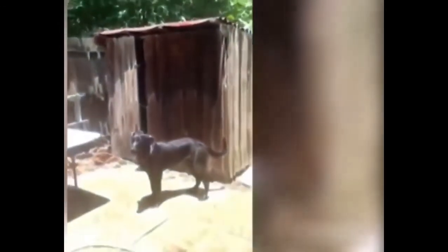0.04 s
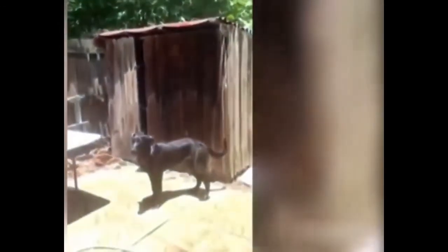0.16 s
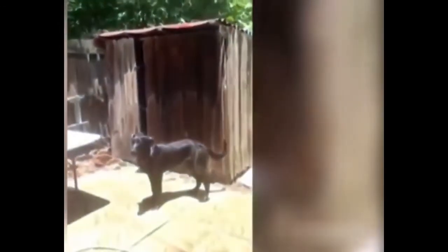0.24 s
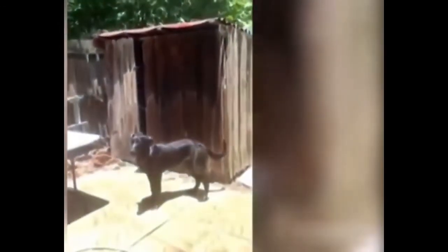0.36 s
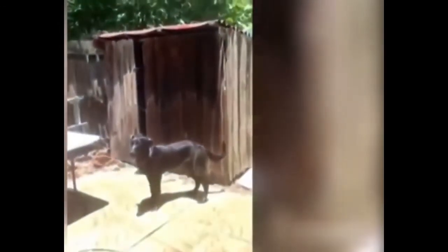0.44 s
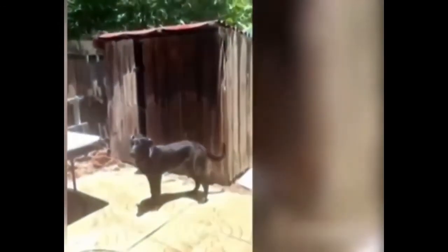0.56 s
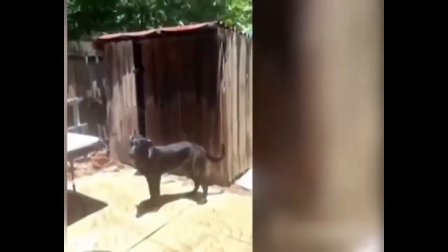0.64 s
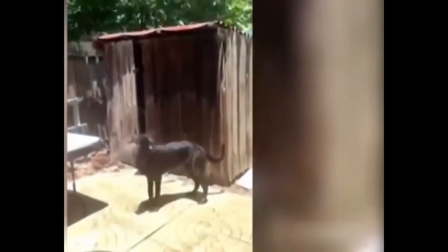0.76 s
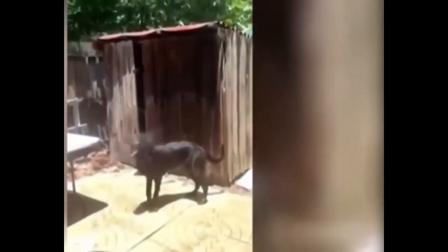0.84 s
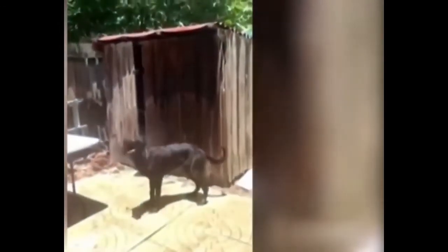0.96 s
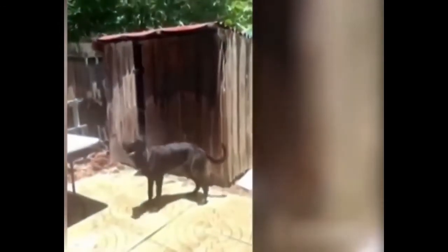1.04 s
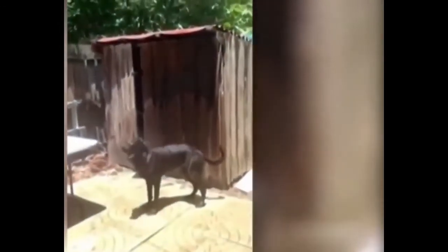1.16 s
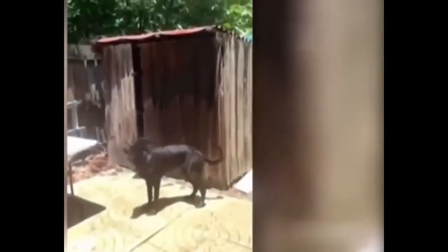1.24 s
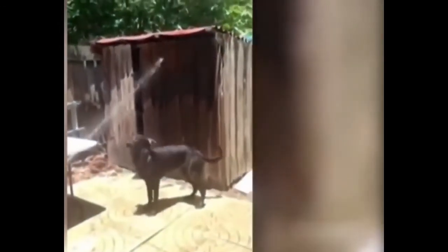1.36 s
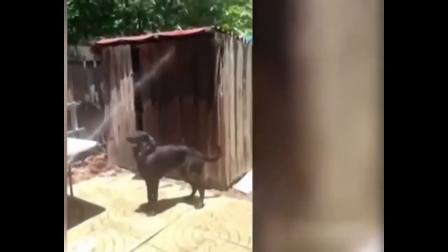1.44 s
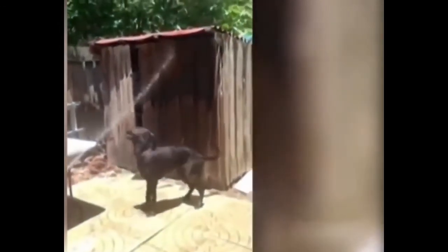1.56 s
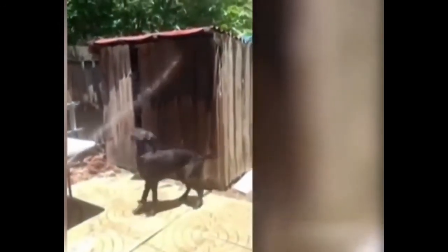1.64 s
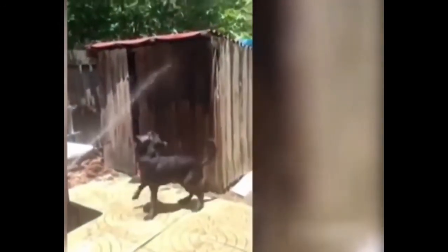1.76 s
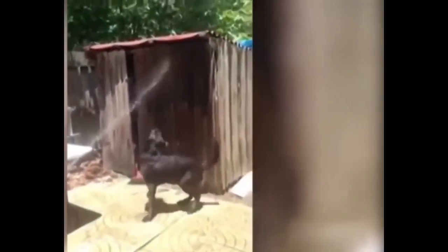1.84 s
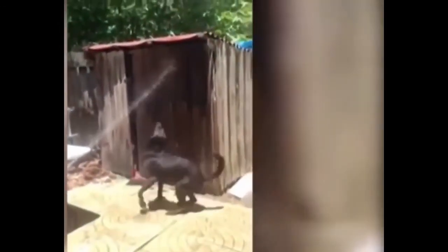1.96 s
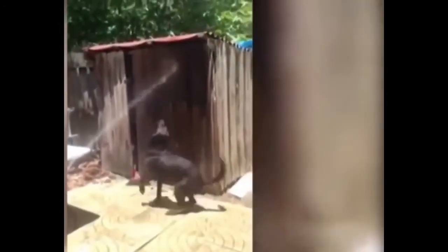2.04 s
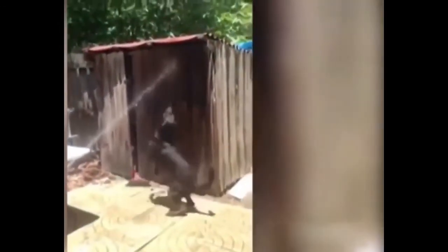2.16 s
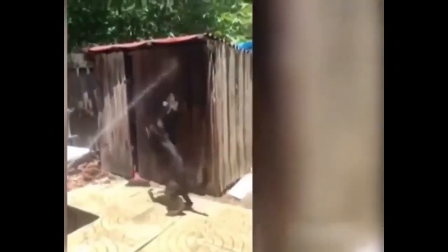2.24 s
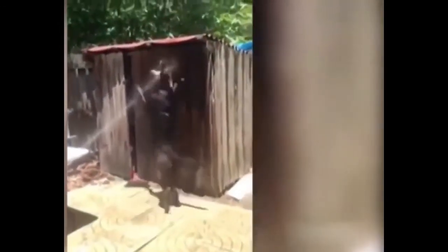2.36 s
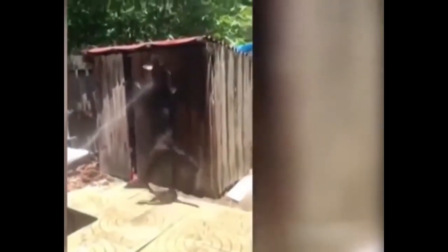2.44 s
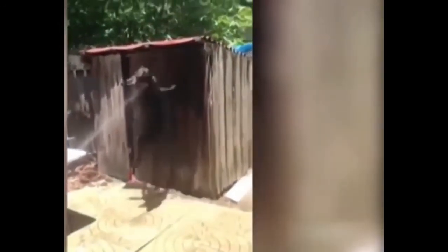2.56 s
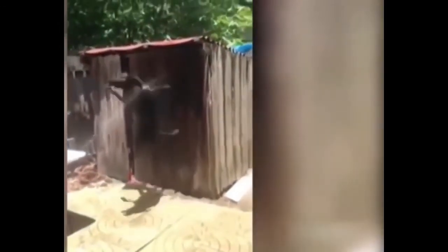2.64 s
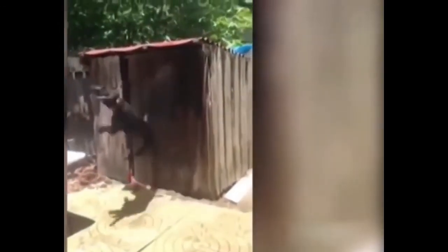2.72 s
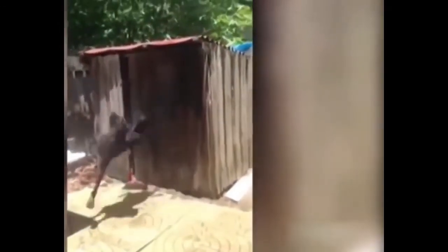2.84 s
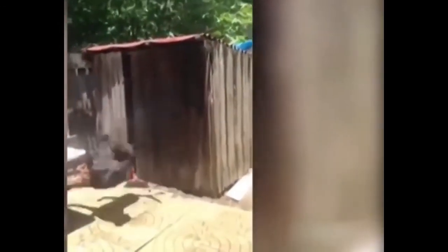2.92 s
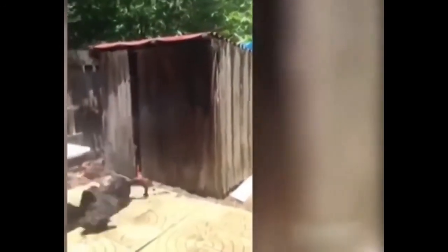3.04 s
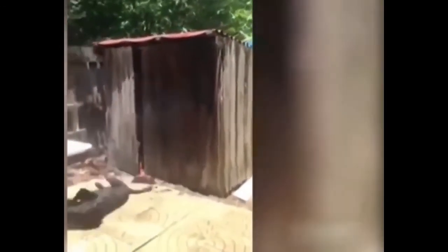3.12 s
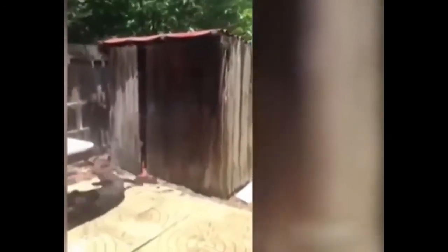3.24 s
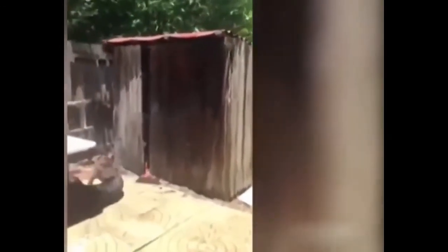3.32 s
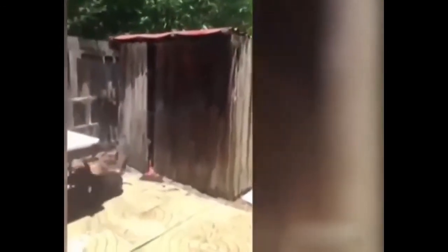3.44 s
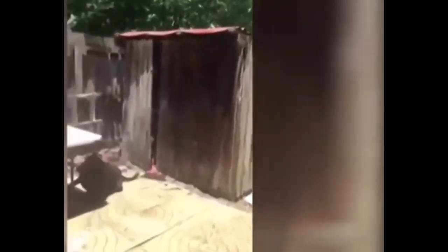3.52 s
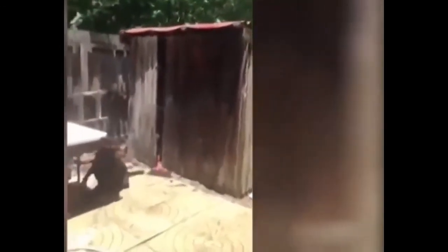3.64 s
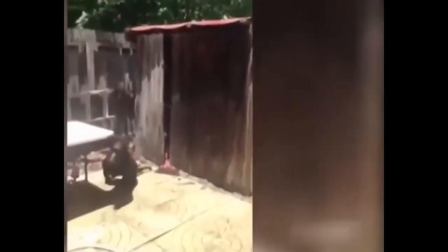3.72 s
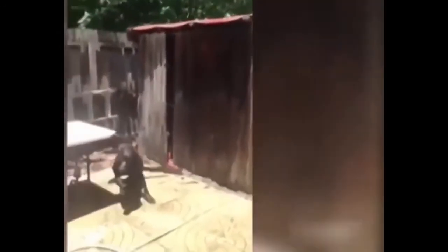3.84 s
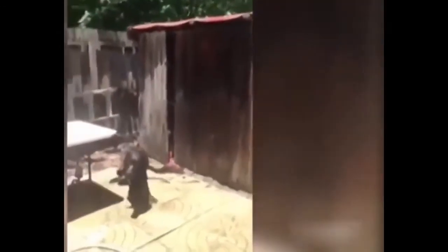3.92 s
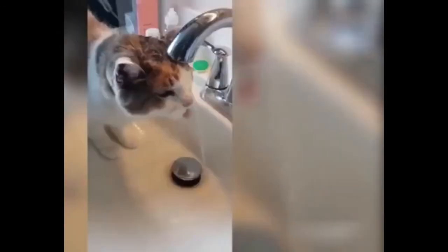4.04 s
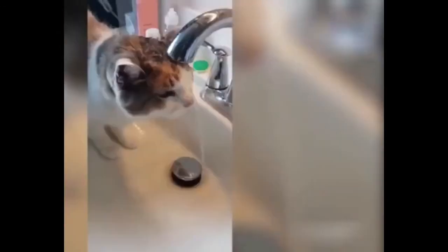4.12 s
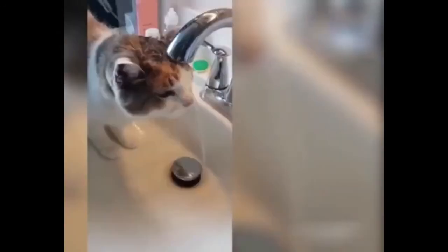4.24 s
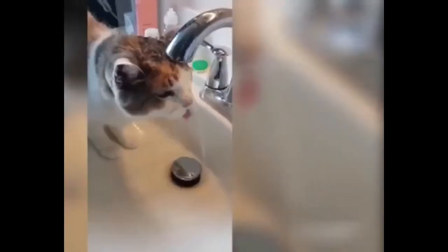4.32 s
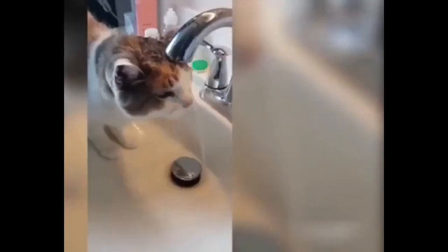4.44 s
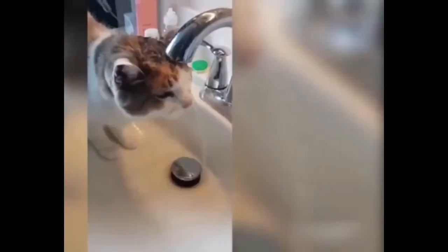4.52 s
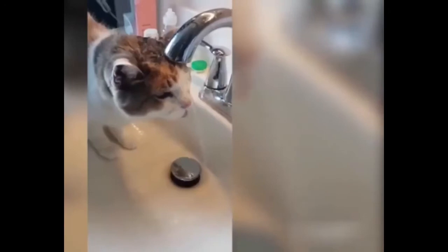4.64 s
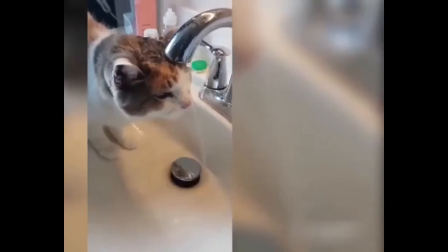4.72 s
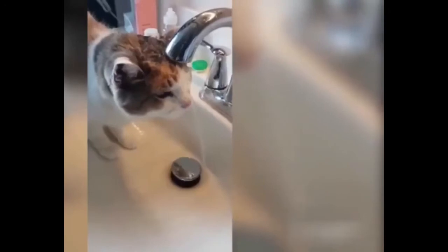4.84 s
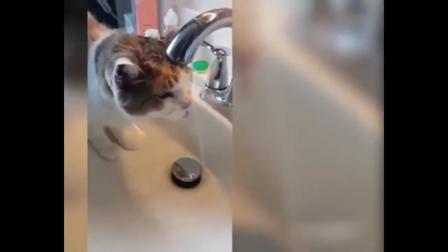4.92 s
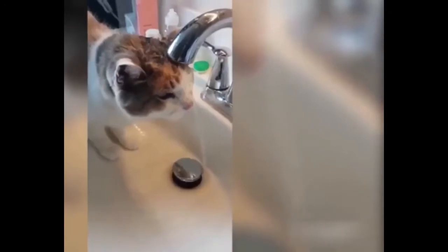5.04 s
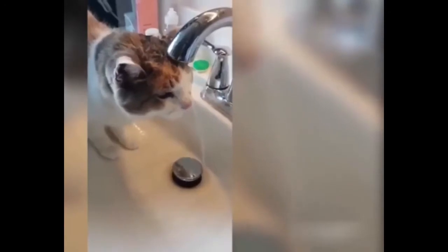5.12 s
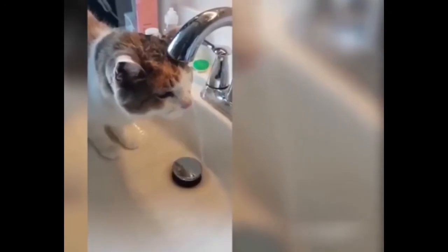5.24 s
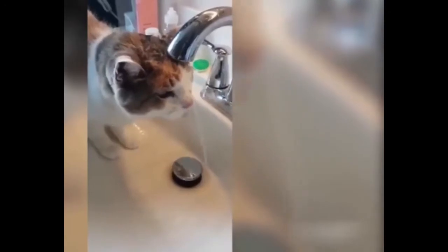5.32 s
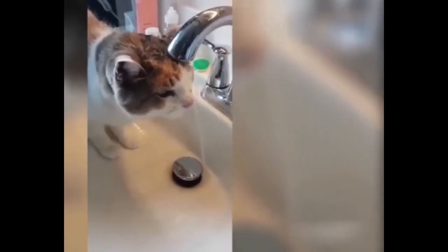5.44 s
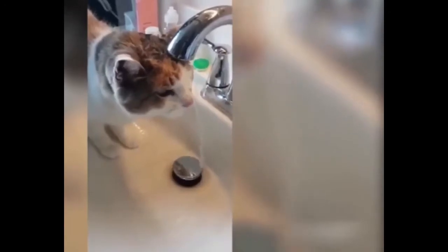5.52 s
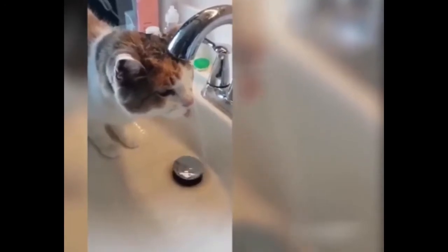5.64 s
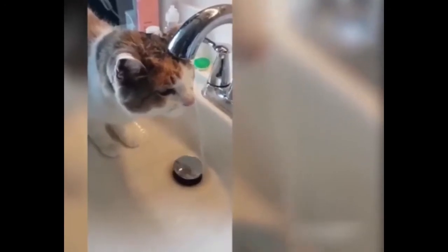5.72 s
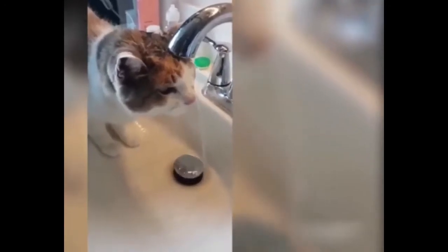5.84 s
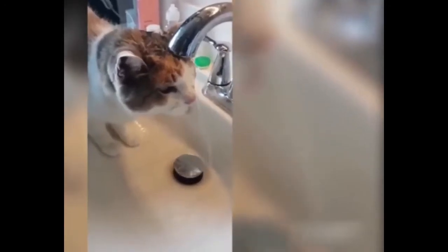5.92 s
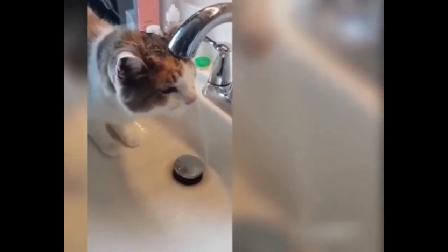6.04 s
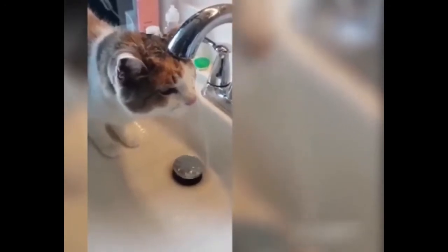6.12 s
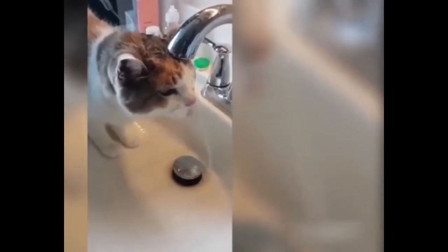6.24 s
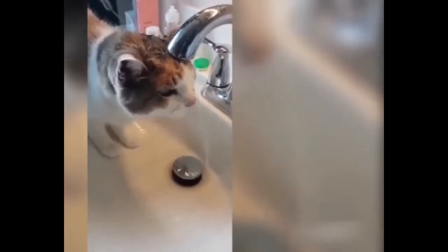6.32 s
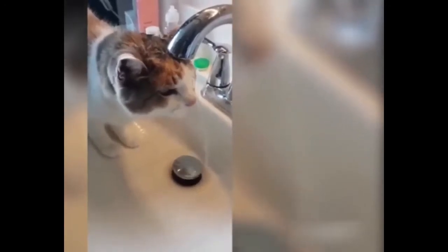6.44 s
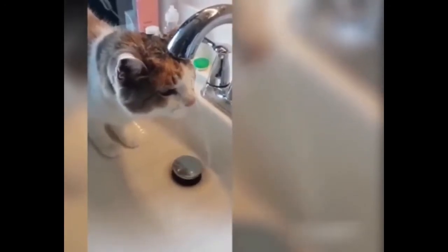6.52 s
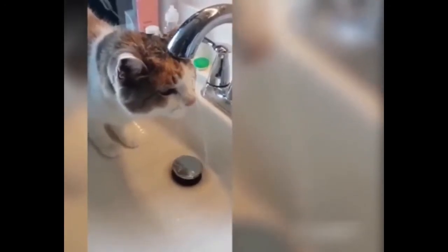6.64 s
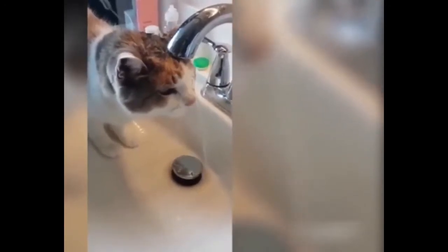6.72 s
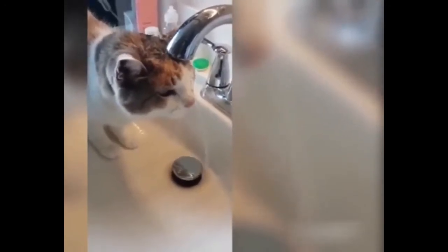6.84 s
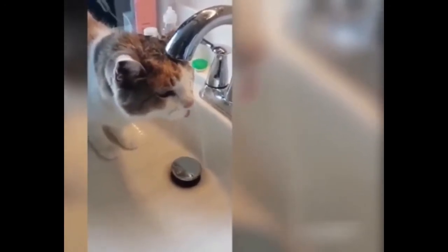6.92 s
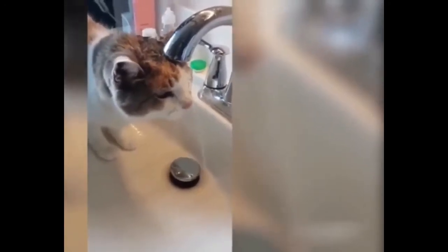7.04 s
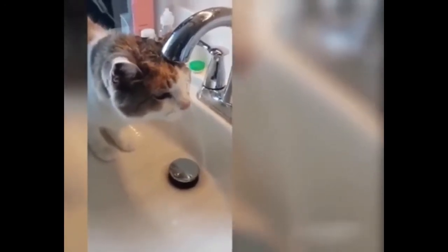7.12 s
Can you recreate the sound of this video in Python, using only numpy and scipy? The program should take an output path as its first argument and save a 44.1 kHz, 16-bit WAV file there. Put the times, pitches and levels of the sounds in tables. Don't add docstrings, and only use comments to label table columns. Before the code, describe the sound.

For the first four seconds, a mono outdoor yard: soft machinery hum, low puffs of wind, and a faint falling bird whistle from 0.3 to 0.75. From 0.8 to 1.5 dog paws step and skid on gritty concrete, with small brass collar tags jingling. At about 1.6 a hose jet begins hissing and splashing on boards. A push-off scrape and thump come at 2.55, then the dog crashes into the wooden shed: very loud cracks, rattles and low thuds at 2.9, 3.05 and 3.2. Spray dwindles through tag jingles, claw scrapes and wind gusts until 4.0. At 4.07 it cuts abruptly to a quieter stereo bathroom: a steady, thin tap stream fizzing in a basin over faint house rumble. A bright drip lands at 4.1, with sparse hollow drips, tiny cat-lapping clicks, and sharp droplet ticks towards the right, strongest near 6.9, until about seven seconds.

```python
import sys
import numpy as np
from scipy import signal
from scipy.fft import rfft, irfft, next_fast_len
from scipy.io import wavfile
from scipy.ndimage import uniform_filter1d, map_coordinates

SR = 44100
rng = np.random.default_rng(int(sys.argv[2]) if len(sys.argv) > 2 else 0)


def volts_from_db(level):
    exponent = np.asarray(level, float) / 20
    return 10 ** exponent


def output_pcm(signal):
    pcm = np.clip(np.atleast_2d(signal).T, -1, 1) * 32767
    wavfile.write(sys.argv[1], SR, np.round(pcm).astype(np.int16))


N = 316197
BATHROOM_S = 4.07

# (frequency [Hz], level [dB per Hz])
YARD_COLOUR = [(65, -29), (110, -8), (156, -8), (184, -9), (235, -3.5), (514, -17), (1440, -21.5),
               (2000, -27), (2260, -25), (8090, -40), (15000, -44)]
RUMBLE_COLOUR = [(13, -48), (22, -11), (48, -22), (65, 2.5), (113, -8.5), (160, -18), (210, -19),
                 (350, -120)]
# (frequency [Hz], width [Hz], level [dB])
MOTOR_LINES = [(58, 9.8, -66), (150.4, 6.2, -67.5), (232, 3.2, -65.5), (356, 5.5, -73)]
RUMBLE_DB, HUM_DB = -66.5, -57.5
# (time [s], lift [dB], half length [s])
GUSTS = [
    (0, 3, 0.09),
    (0.518, 4, 0.036),
    (.74, 5.5, 0.07),
    (2.654, 9, 0.31),
    (3.51, 12.5, 0.22),
    (3.987, 8, .1),
]
GUST_HUM_SHARE = 0.042

CALL_S, CALL_LENGTH_S, CALL_ATTACK_S, CALL_RELEASE_S = 0.278, 0.48, 0.034, 0.1
CALL_DB, CALL_HZ, CALL_SAG_HZ, CALL_BEND = -68.5, 3440, 600, 1.9
CALL_ECHO_DB, CALL_ECHO_T60 = -0.5, 0.71

# (time [s], peak level [dB], centre [Hz], time to fall 60 dB [s])
STEPS = [(.772, -36.5, 6600, 0.069), (.773, -39, 3180, 0.14), (1.029, -50, 10400, .026),
         (1.057, -36, 4200, 0.028), (1.105, -53, 11900, .069), (1.132, -43, 10050, 0.036),
         (1.271, -43, 9700, 0.032), (1.34, -43, 10800, 0.073), (1.505, -50, 7140, 0.25),
         (2.242, -40, 4500, 0.056), (3.694, -46, 3000, 0.026), (3.928, -49, 4500, .03),
         (3.872, -46.5, 4330, 0.23), (3.022, -34, 6500, 0.36), (3.385, -48, 6000, 0.33),
         (3.851, -50, 5030, .04), (3.87, -44, 7350, 0.018), (4.003, -50.5, 6040, 0.068)]
SLIDES = [
    (.89, -43.5, 7250, 0.44),
    (.944, -35, 6700, 0.15),
    (1.173, -43, 7700, 0.14),
    (1.362, -36.5, 4940, 0.1),
    (2.539, -31.5, 4770, 0.17),
    (2.61, -41.5, 2730, 0.8),
]
CLAWS = [(.773, -35.5, 6740, 0.043), (1.057, -38, 4900, .05), (1.058, -42, 3000, .12),
         (3.869, -46, 5600, .03), (1.366, -40, 6940, 0.045), (2.702, -33, 3700, 0.07),
         (2.704, -35, 4450, 0.16), (3.454, -35, 3820, 0.12), (3.455, -39, 5370, 0.18),
         (3.544, -46, 3960, 0.062), (3.871, -50, 2200, 0.43), (3.898, -51, 4020, 0.28),
         (.53, -71, 6400, 0.82)]
KNOCKS = [(2.298, -41, 2350, 0.14), (2.305, -41.5, 625, 0.13), (2.655, -44, 1940, .12),
          (2.735, -41.5, 2200, 0.22), (2.881, -30, 5600, 0.033), (2.889, -17.5, 1820, 0.082),
          (2.895, -20, 3350, 0.048), (2.909, -29, 3280, 0.047), (2.918, -26.5, 1150, 0.05),
          (3.011, -26, 800, 0.097), (3.016, -22.5, 1900, 0.036), (3.031, -28.5, 5530, 0.15),
          (3.042, -27, 3000, 0.098), (3.064, -21, 600, .08), (3.078, -30, 4100, .05),
          (3.199, -20, 1820, .1), (3.201, -24, 3800, 0.068), (3.212, -25, 2000, 0.055),
          (3.2, -22.5, 800, 0.086), (2.937, -28, 280, 0.11), (3.306, -40, 4100, 0.054),
          (3.404, -47, 2700, .12), (3.432, -44, 3360, 0.092)]
STEP_WIDTH, SLIDE_WIDTH, CLAW_WIDTH, KNOCK_WIDTH = 1.05, 2.7, 0.29, 0.36
STEP_RISE, SLIDE_RISE, CLAW_RISE, KNOCK_RISE = 0.011, 0.1, 0.046, 0.038

# (time [s],
# peak level [dB], partner [name], partner over main [dB])
TAG_HITS = [(1.1094, -59, "top", 1), (1.131, -59, "low", 5), (1.1325, -59, "thin", 10.5),
            (1.1727, -44, "top", -8), (1.1766, -59, "low", 8), (1.19, -44, "top", -1),
            (1.191, -55, "ring", 5), (1.19, -62, "thin", 7), (1.201, -51.5, "low", 7),
            (1.2088, -44, "high", -15), (1.27, -47, "high", -13), (1.272, -72, "deep", 3),
            (1.286, -64, "ring", 5), (1.3425, -43, "top", -3), (1.506, -46, "high", -15),
            (1.5283, -49, "low", -13), (1.636, -35.5, "low", -25), (1.813, -39, "low", -29),
            (2.038, -44, "low", -4.5), (2.2408, -61.5, "ring", 2), (2.701, -41, "low", -4),
            (2.725, -35, "low", -19), (2.83, -52.5, "low", 16.5), (2.842, -60, "high", 9),
            (2.855, -50, "low", -9), (2.884, -62, "top", 2), (2.9607, -49, "low", -6),
            (3.083, -65, "top", 4), (3.185, -45, "high", -2), (3.322, -62, "high", 5),
            (3.33, -59, "low", 6), (3.338, -61, "deep", 7), (3.367, -56, "low", 9),
            (3.378, -53, "low", -12), (3.428, -48, "low", -11), (3.493, -58, "ring", 4),
            (3.517, -61, "ring", 5), (3.351, -47.5, "low", -1), (3.408, -52, "low", -9),
            (3.453, -52.5, "low", 5), (3.501, -42.5, "low", -6), (3.511, -58, "top", 3),
            (3.546, -56, "top", -2), (3.558, -65, "high", 7), (3.6726, -64, "low", 1),
            (3.7584, -60.5, "low", -22), (3.785, -66, "ring", -8), (3.815, -63, "top", -5),
            (3.8816, -61, "high", -8), (3.892, -62, "low", -5), (3.9674, -64.5, "low", -3),
            (4.045, -70, "low", -15),
            (1.19, -67, "deep", 7),
    (1.275, -64, "top", 5),
    (1.507, -68, "top", 3),
    (2.72, -58, "top", 5),
    (3.335, -66, "top", 4),
    (3.468, -66, "high", 6),
]
# (frequency [Hz], level [dB], time to fall 60 dB [s])
TAG_TONES = [(8740, -0.5, 0.07), (8010, 2, 0.1), (7030, -1, 0.092), (5660, 2, 0.078), (11150, -5, 0.09),
             (12800, -2, 0.085), (14600, 0, 0.072)]
TAG_OF_TONE = [0, 2, 1, 6, 3, 5, 4]
SHAKEN_DB = {"low": -14, "ring": -21, "thin": -35, "top": -13, "high": -17, "deep": -27}

# (time [s], hiss level [dB], splash over hiss [dB])
JET_ON_BOARDS = [
    (1.581, -46.5, -7),
    (1.64, -47.5, -1.1),
    (1.77, -47, -3.5),
    (1.9, -50, -1),
    (2.52, -53, -0.3),
]
DOG_IN_JET = [
    (2.58, -45.5, -12),
    (2.66, -46.5, -28),
    (2.73, -47.5, -17),
    (2.87, -47, -8),
    (3.0, -51.5, -6),
]
WET_SCRAMBLE = [
    (3.09, -50, -6),
    (3.18, -60.5, 9.5),
    (3.3, -66, 15),
    (3.4, -56, -6),
    (3.5, -56.5, 1.5),
    (3.66, -69, 3.5),
    (3.85, -71.5, -25),
    (4.06, -77, -7),
]
# (frequency [Hz], level [dB per Hz])
SPLASH_COLOUR = [(150, -27), (250, 0), (301, -2.5), (609, -3.5), (933, -7.5), (2070, -3.5), (2890, -6),
                 (3970, -7), (6000, -31), (7800, -47), (13200, -120)]
HISS_COLOUR = [(2060, -31), (3500, -1), (6690, -3.5), (8830, -2.5), (9630, -3.5), (14200, -3.5),
               (15300, -6.5)]

# (time [s], peak level [dB], crack level [dB], time to fall 60 dB [s])
BLOWS = [(2.543, -34.5, -6, 0.06), (2.551, -28, -16, 0.074), (2.6, -55, -16, .056), (2.768, -38, -6, 0.17),
         (2.881, -16, -4, 0.15), (2.892, -18, -10.5, 0.15), (2.909, -19, -5, 0.1), (2.949, -32, -3, 0.15),
         (3.017, -20, -5, .21), (3.026, -17, -7, 0.15), (3.044, -23, 0, 0.24), (3.069, -21, -6, 0.27),
         (3.099, -33.5, -17, 0.56), (3.198, -22, 6.5, 0.14), (3.23, -32, -8, 0.29),
         (3.269, -29.5, -5, 0.15), (3.309, -35, -2, 0.1)]
# (frequency [Hz], level [dB per Hz])
BOARD_COLOUR = [(71, -34), (120, -0.5), (147, -6), (183, -5.5), (261, 1), (433, -5), (541, -5), (1080, -12),
                (2000, -21.5), (2600, -23), (4400, -120)]
CRACK_COLOUR = [(590, -22), (1000, -7), (1200, -6.5), (2120, -7.5), (3090, -11.5), (3620, -7),
                (13000, -25.5), (15200, -22)]
DULL_TOP_HZ, SHARP_FROM_DB = 4430, 3.5
# (time [s], peak level [dB], frequency [Hz])
THUDS = [(2.549, -34, 70.4), (2.594, -32, 65), (2.876, -22, 77), (2.91, -28, 80), (3.034, -21.5, 144),
         (3.074, -29, 98), (3.119, -34.5, 121), (3.213, -28, 72), (3.245, -38, 98), (3.302, -36.5, 149.6),
         (3.406, -39, 70.6)]
THUD_T60 = 0.11

# (frequency [Hz], level [dB per Hz])
FIZZ_COLOUR = [(210, -14), (350, -4), (378, -26), (403, -7), (559, -22.5), (653, -8), (707, -12.5),
               (1080, -9), (1540, -12), (2390, -4.5), (3530, -7), (6380, -6.5), (7350, -7.5),
               (11700, -14.5), (14600, -17)]
FIZZ_SIDE_COLOUR = [(210, -42), (350, -12), (493, -17), (1400, -14.5), (1950, -13), (2310, -7.5),
                    (2660, -10.5), (3260, -6.5), (4390, -9), (6690, -7.5), (7460, -5.5), (8860, -11),
                    (9880, -20), (11700, -14), (14600, -22.5)]
HOUSE_COLOUR = [(15, -54), (25, -28), (54, -6.5), (130, 1), (257, -5.5), (339, -9), (379, -14), (515, -9.5),
                (700, -16.5), (910, -44), (1540, -120)]
FIZZ_DB, HOUSE_DB = -59.5, -68
# (frequency [Hz], left minus right [dB])
FIZZ_LEAN = [(60, 8), (290, -1.5), (1410, 0.5), (3100, 2), (6800, 4), (9000, -13.5), (12000, -7.5),
             (14500, -12)]
# (frequency [Hz], width [Hz], lift [dB])
BASIN = [(2540, 210, 2), (4730, 78, 4), (6400, 460, 8), (685, 25, 7), (8600, 390, 3.5), (11520, 300, 6)]

# (time [s], peak level [dB], landing place [name])
DRIPS = [
    (4.1042, -31.5, "plug"),
    (4.8174, -43, "grate"),
    (5.1707, -47, "pipe"),
    (5.4931, -68.5, "trap"),
    (5.546, -42, "film"),
    (6.302, -70.5, "trap"),
    (6.349, -43.5, "grate"),
    (6.7413, -41, "grate"),
]
# (frequency [Hz], level [dB], time to fall 60 dB [s])
DRAIN_TONES = [(1772, 2, 0.034), (1820, -30, .1), (1154, 5, 0.041), (936.4, 1.5, 0.2), (335, 6.5, 0.095),
               (2080, -5.5, 0.087), (2310, 1, 0.021), (2790, -6.5, 0.032)]
PART_OF_TONE = [0, 0, 4, 1, 2, 3, 3, 3]
LANDINGS = {"plug": (-24.5, -29.5, -4.5, -34), "grate": (-12.5, -21, -7, -5.5), "pipe": (8, -14.5, -7, -25),
            "trap": (-7, 7, .4, -15), "film": (-33, -35, 2, -37)}

# (time [s], peak level [dB], centre [Hz],
# left minus right [dB])
LAPS = [(4.2143, -42.5, 6640, 6), (4.4493, -46, 6260, 2.5), (4.4717, -45, 9150, -13),
        (4.659, -46, 5950, 1.2), (5.12, -49, 6700, 2), (5.4914, -46, 4560, 7), (5.5134, -43, 7550, 1.2),
        (5.5468, -33, 2100, 0), (5.777, -41.5, 4130, 13), (6.0394, -53, 2710, 1.5),
        (6.6997, -48.5, 4900, 4), (6.8944, -50, 2730, 6)]
TICKS = [
    (4.104, -33, 4240, 2),
    (4.104, -36, 3100, 2),
    (5.1761, -44, 10200, -16),
    (5.7658, -44, 12100, -17),
    (6.337, -45, 11400, -13.5),
    (6.557, -55, 9000, -12.5),
    (6.628, -36, 12500, -19),
    (6.7017, -55, 10400, -12.5),
    (6.8299, -51, 9480, -12),
    (6.9351, -30, 9740, -19),
]
LAP_T60, TICK_T60 = 0.023, 0.007

# (frequency [Hz], bands left empty [share])
YARD_HOLES = [(8000, 0), (9500, .04), (10500, .005), (12800, .01), (13600, .12), (14300, .02)]
BATHROOM_HOLES = [(2700, .0), (3000, .28), (3600, .46), (4300, .46), (4700, .04), (5300, .03), (5800, 0),
                  (7000, 0), (7400, .09), (8000, 0), (11500, .02), (13500, .2)]
LEFT_HOLES = [(9200, 0), (9800, .4), (11000, .28), (12300, .35), (13200, .85), (14500, .93)]


def unit(x):
    return x / np.sqrt(np.mean(x ** 2) + 1e-20)


def along(points, hz):
    f, v = np.transpose(points)
    return np.interp(np.log(hz + 1), np.log(f + 1), v)


def curves(rows):
    s, *cols = np.transpose(rows)
    return [np.interp(np.arange(N) / SR, s, c, -150, -150) for c in cols]


def wobble(rate, size=N, order=3):
    knots = rng.standard_normal(int(size * rate / SR) + 4)
    return map_coordinates(knots, [np.arange(size) * rate / SR], order=order)


def swell(s, half_s):
    return np.exp(-((np.arange(N) / SR - s) / half_s) ** 2)


def filtered(x, response):
    m = next_fast_len(x.shape[-1] + 8192)
    return irfft(rfft(x, m) * response(np.fft.rfftfreq(m, 1 / SR)), m)[..., :x.shape[-1]]


def bell(hz, centre_hz, width_hz):
    return 1j * hz * width_hz / (centre_hz ** 2 - hz ** 2 + 1j * hz * width_hz)


def rush(spectrum, patchy_db, grain_db):
    z = signal.stft(rng.standard_normal(N + SR), nperseg=512)[2]
    field = uniform_filter1d(rng.standard_normal(z.shape), size=6, axis=0)
    field = uniform_filter1d(field, size=10, axis=1)
    x = signal.istft(z * volts_from_db(patchy_db * unit(field)), nperseg=512)[1][:N]
    grainy = x * volts_from_db(grain_db * wobble(400, order=1))
    return unit(filtered(grainy, lambda hz: volts_from_db(along(spectrum, hz))))


def add(track, s, sound):
    part = track[..., round(s * SR):][..., :sound.shape[-1]]
    part += sound[..., :part.shape[-1]]


def fall(t60, rise):
    t = np.arange(round(SR * min(0.25, 2 * t60 + 0.02))) / SR
    return t, (1 - np.exp(-t / rise)) * volts_from_db(-60 * t / t60)


def struck(events, modes, owner, scatter_db, flutter_db, grain_db, rise):
    out = np.zeros(N)
    for (hz, level, t60), k in zip(modes, owner):
        t, env = fall(t60, rise)
        tone = env * np.sin(2 * np.pi * hz * t)
        ring = np.zeros(N)
        for s, db, *rel in events:
            beat = 1 + flutter_db / 10 * np.sin(2 * np.pi * (rng.uniform(41, 100) * t + rng.random()))
            hit_db = db + [0, *rel][k] + level + rng.normal(0, scatter_db)
            add(ring, s, volts_from_db(hit_db) * beat * tone)
        out += ring * volts_from_db(grain_db * wobble(130, order=1))
    return out


def echoes(x, t60, channels):
    t, env = fall(t60, rise=0.0032)
    tail = rng.standard_normal((channels, len(t))) * env
    return signal.fftconvolve(x, tail / np.linalg.norm(tail[0]), axes=1)[:, :N]


def air():
    gust_db = sum(db * swell(s, half_s) for s, db, half_s in GUSTS)
    rumble_db = RUMBLE_DB + gust_db + 1.8 * wobble(7)
    out = volts_from_db(rumble_db) * rush(RUMBLE_COLOUR, patchy_db=1, grain_db=0)
    hum_db = HUM_DB + GUST_HUM_SHARE * gust_db
    out += volts_from_db(hum_db - 2.5) * rush(YARD_COLOUR, patchy_db=1.1, grain_db=0)
    for hz, width, db in MOTOR_LINES:
        line = filtered(rng.standard_normal(N), lambda f: bell(f, hz, width) ** 2)
        out += volts_from_db(db) * unit(line)
    return out


def bird():
    t = np.arange(N) / SR - CALL_S
    sunk = np.clip(t / CALL_LENGTH_S, 0, 1) ** CALL_BEND
    env = np.clip(np.minimum(t / CALL_ATTACK_S, (CALL_LENGTH_S - t) / CALL_RELEASE_S), 0, 1)
    pitch_hz = CALL_HZ - CALL_SAG_HZ * sunk + 30 * wobble(200)
    phase = 2 * np.pi * np.cumsum(pitch_hz) / SR
    tone = np.sin(phase) + 0.15 * (sunk < 0.3) * np.sin(phase * 1.52)
    level_db = CALL_DB + 0.5 + 1.6 * wobble(45.6) + 4.5 * swell(CALL_S + 0.2, 0.12)
    call = env * volts_from_db(level_db) * tone
    return call + volts_from_db(CALL_ECHO_DB) * echoes(call[None], CALL_ECHO_T60, channels=1)[0]


def paws():
    out = np.zeros(N)
    kinds = ((STEPS, STEP_WIDTH, STEP_RISE), (SLIDES, SLIDE_WIDTH, SLIDE_RISE),
             (CLAWS, CLAW_WIDTH, CLAW_RISE), (KNOCKS, KNOCK_WIDTH, KNOCK_RISE))
    for rows, width, rise in kinds:
        for s, db, centre_hz, t60 in rows:
            t, env = fall(t60, rise * t60)
            grit = rng.standard_normal(len(t)) * volts_from_db(2.0 * wobble(471, size=len(t)))
            scuff = unit(filtered(grit, lambda hz: bell(hz, centre_hz, width * centre_hz) ** 2))
            add(out, s, volts_from_db(db - 9.5) * env / env.max() * scuff)
    return out


def tags():
    hits = []
    for s, db, partner, partner_db in TAG_HITS:
        levels = {**SHAKEN_DB, partner: partner_db}
        hits.append((s, db, *levels.values()))
    return struck(hits, TAG_TONES, TAG_OF_TONE, scatter_db=1.5, flutter_db=1, grain_db=3.5, rise=0.00067)


def hose():
    hiss_db, over_db = curves(JET_ON_BOARDS + DOG_IN_JET + WET_SCRAMBLE)
    surge = wobble(14)
    splash_db = hiss_db + over_db + 1.04 * surge
    splash = volts_from_db(splash_db) * rush(SPLASH_COLOUR, patchy_db=1.0, grain_db=1.5)
    return splash + volts_from_db(hiss_db + 1.1 * surge) * rush(HISS_COLOUR, patchy_db=0.9, grain_db=1.5)


def shed():
    out = np.zeros(N)
    for s, db, crack_db, t60 in BLOWS:
        top_hz = DULL_TOP_HZ * (1 + volts_from_db(2 * (crack_db - SHARP_FROM_DB)))
        t, env = fall(t60, rise=0.00062)
        rattle = env * volts_from_db(1.86 * wobble(234, size=len(t)))
        boards = filtered(rng.standard_normal(len(t)), lambda hz: volts_from_db(along(BOARD_COLOUR, hz)))
        crack = filtered(rng.standard_normal(len(t)),
                         lambda hz: volts_from_db(along(CRACK_COLOUR, hz)) / (1 + (hz / top_hz) ** 6))
        blow = unit(rattle * boards) + volts_from_db(crack_db) * unit(rattle * crack)
        add(out, s, volts_from_db(db - 6.5) * np.std(env) * blow)
    for s, db, hz in THUDS:
        t, env = fall(THUD_T60, rise=0.0077)
        add(out, s, -volts_from_db(db + 2.0) * env * np.sin(2 * np.pi * hz * t))
    return out


def stream():
    def basin_and_lean(hz):
        basin = 1 + sum((volts_from_db(db) - 1) * np.abs(bell(hz, c, w)) ** 2 for c, w, db in BASIN)
        return volts_from_db(np.outer([0.5, -0.5], along(FIZZ_LEAN, hz))) * basin

    mid = rush(FIZZ_COLOUR, patchy_db=2.0, grain_db=0.1)
    side = rush(FIZZ_SIDE_COLOUR, patchy_db=1.5, grain_db=3.0)
    fizz = filtered(np.array([mid + side, mid - side]), basin_and_lean)
    low = rush(HOUSE_COLOUR, patchy_db=0.7, grain_db=0)
    low_side = 0.38 * rush(HOUSE_COLOUR, patchy_db=0.7, grain_db=0)
    house = volts_from_db(HOUSE_DB + 0.8 * wobble(9)) * np.array([low + low_side, low - low_side])
    return volts_from_db(FIZZ_DB + 0.47 * wobble(22) + 0.26 * wobble(1.9)) * fizz + house


def drips():
    hits = [(s, db, *LANDINGS[spot]) for s, db, spot in DRIPS]
    return struck(hits, DRAIN_TONES, PART_OF_TONE, scatter_db=0.1, flutter_db=2.0, grain_db=1.3, rise=0.0005)


def laps():
    out = np.zeros((2, N))
    for rows, breadth, t60 in ((LAPS, 0.2, LAP_T60), (TICKS, 0.32, TICK_T60)):
        for s, db, centre_hz, pan_db in rows:
            t, env = fall(t60, rise=0.0001)
            push = env * (0.3 * rng.standard_normal(len(t)) + 6 * (t < 2 / SR))
            click = filtered(push, lambda hz: bell(hz, centre_hz, breadth * centre_hz) ** 2)
            sides_db = db + np.array([[0.5], [-0.5]]) * pan_db
            add(out, s, volts_from_db(sides_db) * click / np.abs(click).max())
    return out


def scene():
    dog = (paws() + tags() + shed())[None]
    yard = air() + bird() + hose() + dog + volts_from_db(-9.5) * echoes(dog, 0.44, channels=1)
    near = drips() * volts_from_db([[-0.7], [0.7]]) + laps()
    bathroom = stream() + near + volts_from_db(-6.5) * echoes(near, 0.18, channels=2)
    return np.where(np.arange(N) < BATHROOM_S * SR, yard, bathroom)


def starved(x, shares, harsh):
    hz, t, z = signal.stft(x, SR, nperseg=2048)
    size = np.abs(z) + 1e-9
    wide = uniform_filter1d(size, size=13, axis=-2)
    loud = wide > 1.8 * np.median(wide, axis=-1, keepdims=True)
    bands = unit(uniform_filter1d(rng.standard_normal(z.shape), size=4, axis=-1))
    chance = 1 / (1 + np.exp(1.7 * bands[..., np.arange(len(hz)) // 8, :]))
    kept = (chance > along(shares, hz)[:, None]) | loud
    contrast = (size / wide) ** (harsh * ~loud)
    return signal.istft(z * contrast * kept, SR, nperseg=2048)[1][..., :x.shape[-1]]


def band_limit(x):
    return signal.sosfilt(signal.butter(12, 16360, fs=SR, output="sos"), x)


def record(dry):
    change = round(BATHROOM_S * SR)
    outdoors = dry[0, :change]
    held = outdoors / (1 + np.abs(outdoors / 0.27) ** 4) ** (1 / 4)
    yard = starved(filtered(held, lambda hz: volts_from_db(-40 * (hz > 15150))), YARD_HOLES, harsh=0.21)
    left, right = filtered(dry[:, change:], lambda hz: volts_from_db(-48 * (hz > 14500)))
    mid, side = starved(np.array([left + right, left - right]) / 2, BATHROOM_HOLES, harsh=0.29)
    left = starved(mid + side, LEFT_HOLES, harsh=0)
    mix = np.hstack([[yard, yard], [left, mid - side]])
    return band_limit(mix)


dry = scene()
out = record(dry)
output_pcm(out)
```